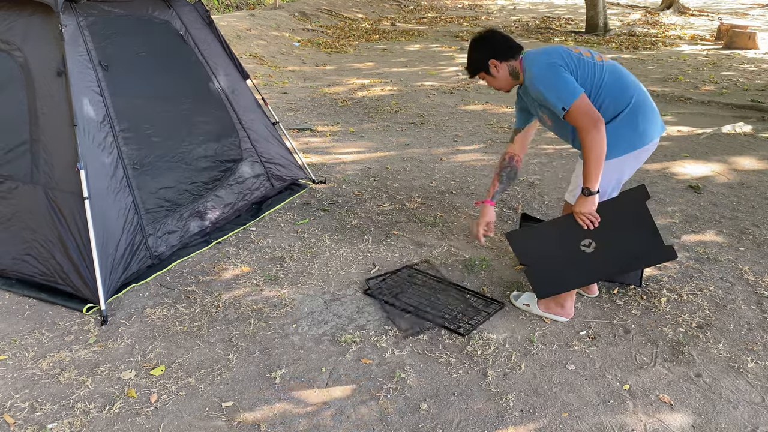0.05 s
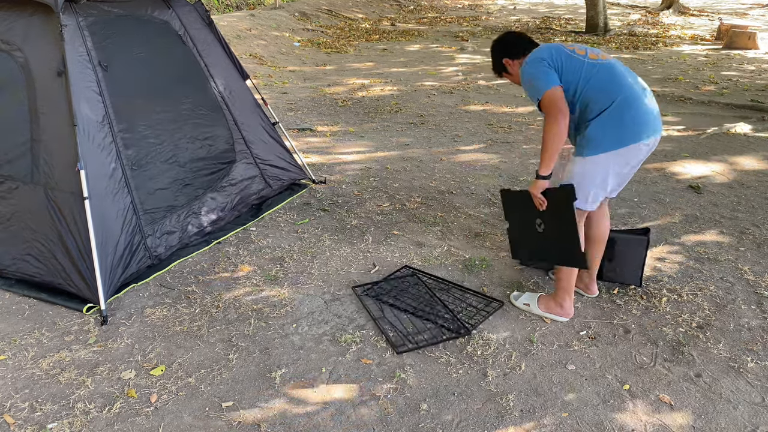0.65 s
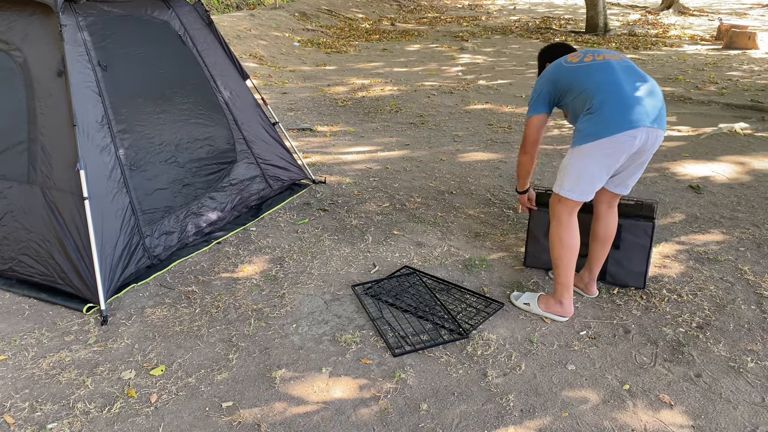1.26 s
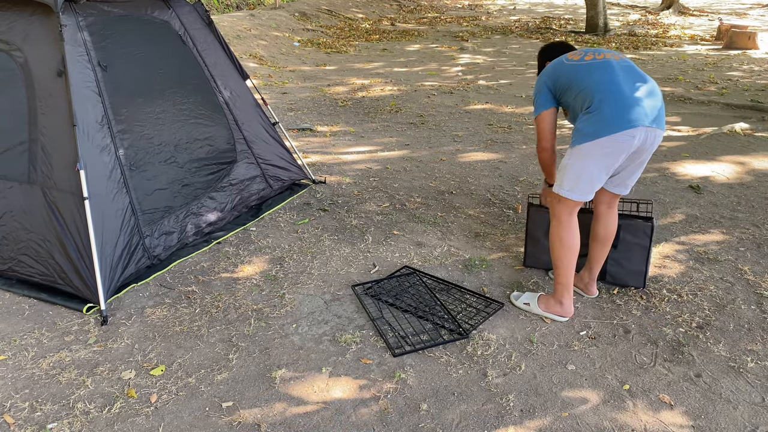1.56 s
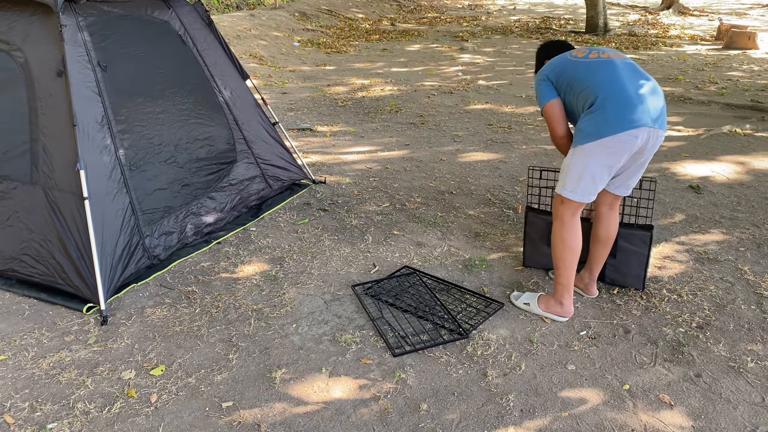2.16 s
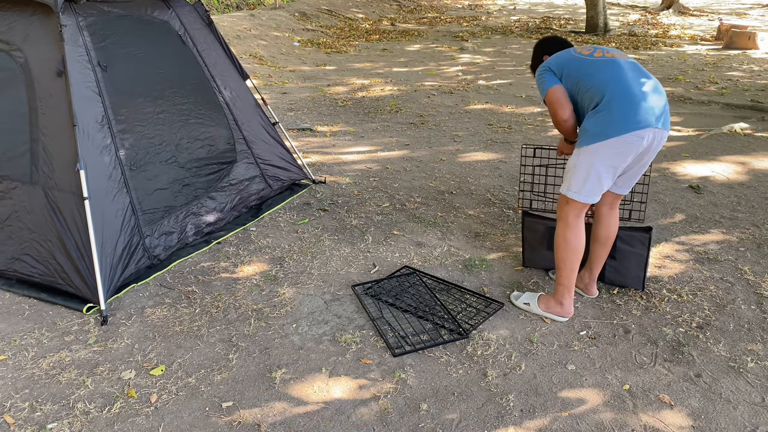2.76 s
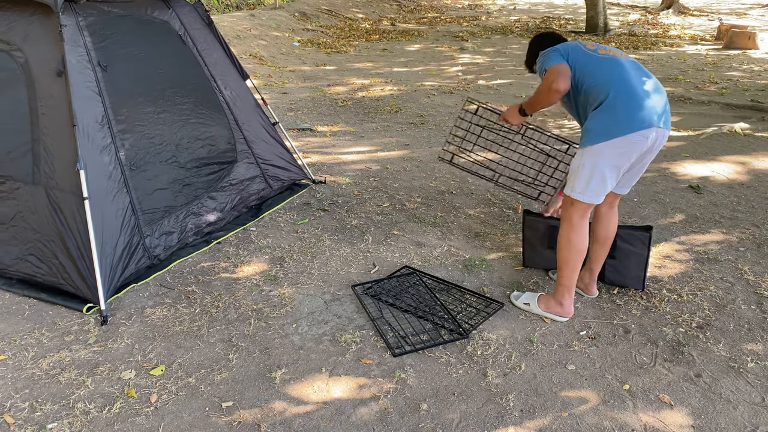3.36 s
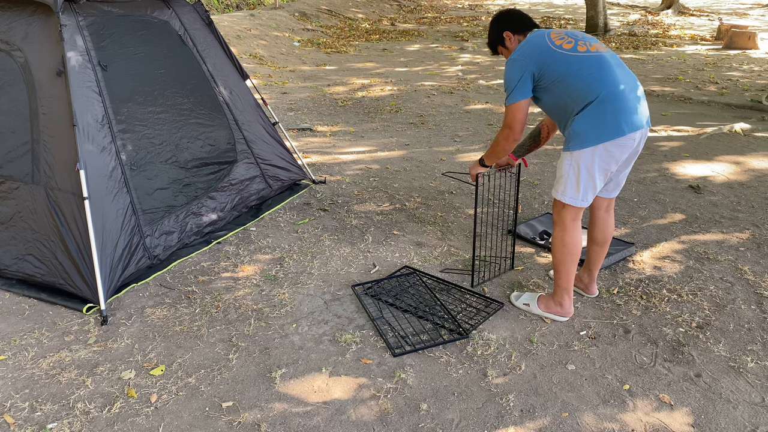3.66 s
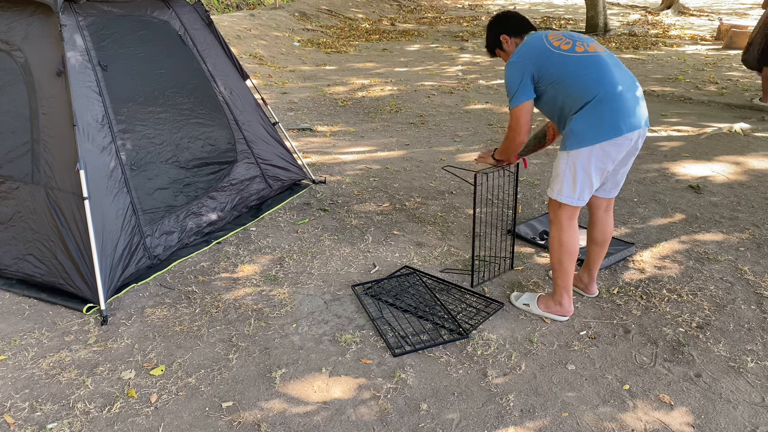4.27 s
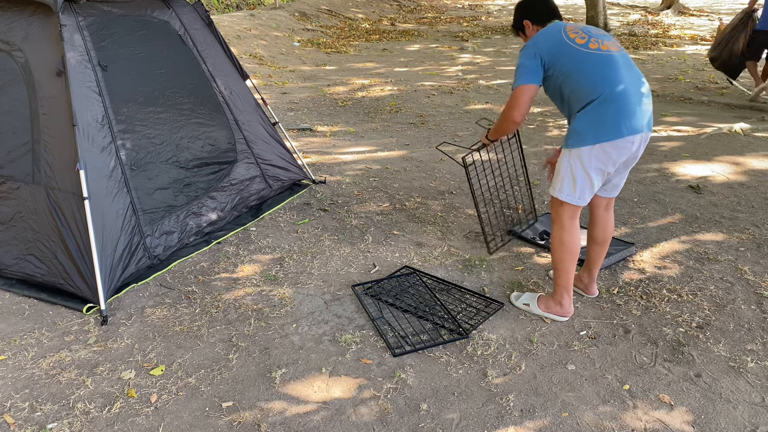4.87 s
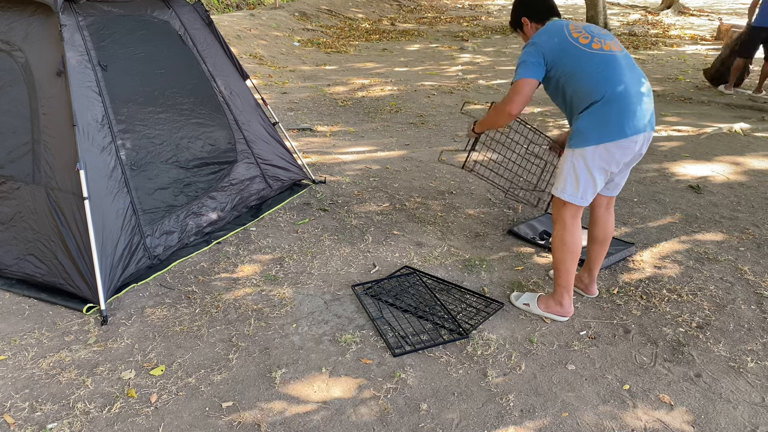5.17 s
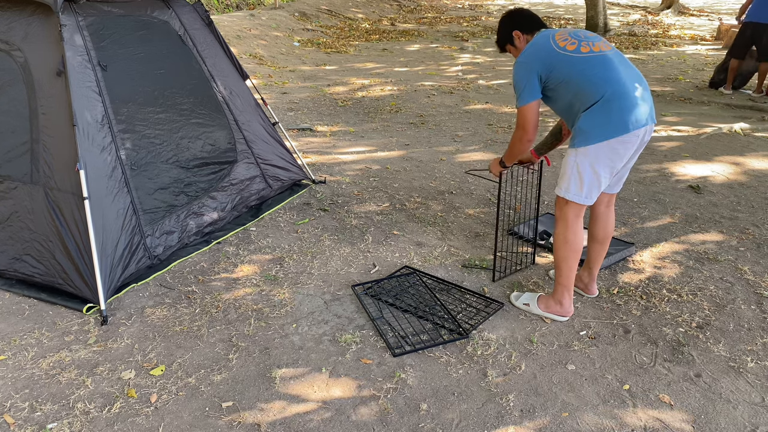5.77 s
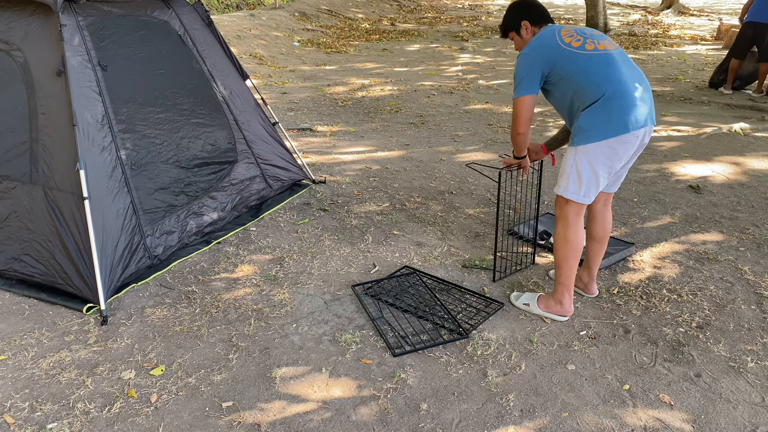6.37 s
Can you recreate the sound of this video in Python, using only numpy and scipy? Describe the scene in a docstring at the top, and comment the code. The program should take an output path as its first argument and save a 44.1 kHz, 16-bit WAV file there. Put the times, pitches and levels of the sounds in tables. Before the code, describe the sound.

Right at the start, metal wire-grid panels fall on each other on packed dirt. They bounce and chatter with a bright ring over damped thuds, strongest near 0.1 and 0.4 seconds, and lie still by 0.9 seconds. This is by far the loudest event. A padded fabric bag is set down slightly to the right, with dull bumps and two sharp wire clicks around 1.4 seconds. Until about 2.7 seconds a panel is drawn out in faint, catching rubs, with a small knock at 2.3. Soft cloth swishes come and go throughout. Wire legs click sharply around 4 seconds, then tick lightly near 4.4 and 4.8. A few dull handling bumps come around 5.3 to 5.4 seconds, and more clicks near 5.9. A faint, low, distant rumble lies under everything. The place is open air, heard by a phone a few metres away.

```python
"""Wire-grid table panels drop on each other on packed dirt and clatter to rest: each impact excites the
grids' bending modes, and the dirt answers with damped thuds. A padded fabric bag is set down, buckling
in dull bumps; another panel is drawn out with stick-slip friction, and its wire legs click as they
unfold. Cloth swishes over a low distant rumble in open air, heard from a few metres by a phone with
two microphones."""
import sys
import numpy as np
from scipy import signal
from scipy.fft import rfft, irfft, next_fast_len
from scipy.io import wavfile
from scipy.ndimage import map_coordinates

SR = 44100
rng = np.random.default_rng(int(sys.argv[2]) if len(sys.argv) > 2 else 0)


def generate_wav(sig):
    """Save sig (samples, or channels by samples) to the path in sys.argv[1] as 16-bit PCM at SR."""
    pcm = np.round(np.clip(np.atleast_2d(sig).T, -1, 1) * 32767).astype(np.int16)
    wavfile.write(sys.argv[1], SR, pcm)


N = 283342
T = np.arange(N) / SR
TOP_HZ = 15800  # upper limit of the phone's band
LEAD_S = 0.05  # bounces may begin this long before a hard contact
LANDED_S, SETTLED_S = 0.012, 0.935  # the falling panels first touch; they lie flat

# panel-on-panel impacts: (time [s], relative level [dB], build-up [s], rattle decay [s], wire pitch [Hz])
PANEL_IMPACTS = [(0.011, -7, 0.0025, 0.019, 7450), (0.043, -5.5, 0.0017, 0.01, 2750),
                 (0.068, -3.5, 0.00058, 0.01, 7000), (0.078, -3, 0.0017, 0.0046, 11000),
                 (0.0847, 2, 0.00039, 0.0021, 7300), (0.089, 0.5, 0.0008, 0.0035, 10900),
                 (0.116, -7.5, 0.0011, 0.015, 4800), (0.3247, -8, 0.0007, 0.0068, 1770),
                 (0.353, -10, 0.0097, 0.0075, 1100), (0.398, -5, 0.0012, 0.018, 6370),
                 (0.4211, -0.5, 0.008, 0.028, 2850), (0.434, 2.5, 0.0049, 0.028, 1260),
                 (0.630, -5, 0.00059, 0.0055, 7380), (0.7597, -21, 0.00072, 0.013, 6900),
                 (0.787, -6, 0.012, 0.016, 7100), (0.869, -16.5, 0.0028, 0.017, 5100)]
# strongest modes of the falling grids: (frequency [Hz], relative level [dB], t60 [s])
FALLING_MODES = [(462, -15.5, 0.31), (797, -14, 0.4), (1100, -8, 0.24), (1248, -9.5, 0.43),
                 (1364, -3.5, 0.16), (1800, -4, 0.32), (2100, -5.5, 0.23), (2330, -10.5, 0.24),
                 (2600, -2, 0.3), (2834, -5.5, 0.3), (3600, -4, 0.2), (4460, -5, 0.3), (4786, -0.5, 0.22),
                 (6355, -3, 0.18), (6860, -4, .2), (7300, 4, 0.1), (11000, 7, 0.14), (11500, 0, 0.1),
                 (15420, 5.5, 0.15)]
# spectral envelope of the falling grids: (frequency [Hz], relative level [dB])
FALLING_SPECTRUM = [(150, -9.5), (400, -14), (700, -16), (1300, -8.5), (1900, -2.5), (2300, -2), (2800, -2),
                    (3500, -5.5), (5500, -2.5), (7200, 0.5), (8500, 0.5), (11000, 1.5), (13200, 0),
                    (15200, -1)]
def falling_panels():
    """Impact excitation: panels strike, bounce and chatter on each other until the dirt damps them."""
    force = 0
    for s, db, build, decay, hz in PANEL_IMPACTS:
        impact = emphasise(blow(build, decay, rattle_db=5.5), hz, relative_width=0.084, lift_db=1.5)
        force = force + undb(db) * place(impact, s - LEAD_S)
    force = undb(11) * force
    panels = grid_responses(FALLING_SPECTRUM, FALLING_MODES, t60=0.15, modes_db=-25, cluster_db=3,
                            crack_db=-10, crack_s=0.0023, crack_tilt=0.29)
    ring = strike(force + chatter(force), panels, hop_rate=90)
    return ring * np.exp(-np.maximum(T - SETTLED_S, 0) / 0.0048)


def blow(build_s, decay_s, rattle_db):
    """Contact force: one hard impulse inside a burst of wire-on-wire rebounds; energy 1."""
    age = T[:SR // 4] - LEAD_S
    swell = np.exp(-np.maximum(age / decay_s, -age / build_s))
    bounces = swell * rng.standard_normal(len(age)) * (rng.random(len(age)) < 0.06)
    force = undb(rattle_db) * bounces / np.sqrt(np.sum(bounces ** 2) + 1e-12)
    force[np.searchsorted(age, 0)] += 1
    return force / np.linalg.norm(force)


def chatter(force, steady_db=-31.5, stir_db=-28, stir_s=0.063, settling_s=0.11, edge_hz=9900):
    """Contact rattle: loose wires tick on each other, harder after every blow, until they lie flat."""
    retention = np.exp(-1 / (stir_s * SR))
    stirred_power = signal.lfilter([1 - retention], [1, -retention], force ** 2)
    strength = np.sqrt(undb(steady_db) ** 2 + undb(stir_db) ** 2 * stirred_power)
    loose = (T > LANDED_S) * (T < SETTLED_S) * np.clip((SETTLED_S - T) / settling_s, undb(-11), 1)
    ticks = contacts(rate=700, scatter_db=2.5) * loose * strength
    return shape(ticks, lambda hz: 1 / np.sqrt(1 + (hz / edge_hz) ** 4))  # duller than a blow


def grid_responses(spectrum, modes, t60, modes_db, cluster_db, crack_db, crack_s, crack_tilt,
                   count=1100, points=8):
    """Modal superposition: each point of a welded grid gives its own mix of damped modes and a crack."""
    t = T[:SR // 3]
    hz = 200 + (TOP_HZ - 200) * (np.arange(count) + rng.random(count)) / count
    clusters = np.repeat(rng.standard_normal(count), 5)[:count]  # like wires ring at nearly one pitch
    gain = undb(at(spectrum, hz) + cluster_db * np.minimum(clusters, 1))
    life = t60 * np.exp(0.2 * rng.standard_normal(count))
    # no two wires are quite alike, so the strong modes come as beating pairs
    strong_hz, strong_db, strong_life = np.repeat(modes, 2, axis=0).T
    strong_hz = strong_hz * (1 + 0.003 * np.tile([-1, 1], len(modes)))
    hz, life = np.r_[hz, strong_hz], np.r_[life, strong_life]
    gain = np.r_[gain / np.linalg.norm(gain), undb(strong_db + modes_db) / np.sqrt(2)]
    times_t = lambda rates: np.outer(np.float32(rates), np.float32(t))
    damped_sines = np.sin(times_t(2 * np.pi * hz)) * np.exp(times_t(-np.log(1000) / life))
    responses = []
    for _ in range(points):
        weights = gain * rng.choice([-1, 1], (2, len(hz))) * rng.uniform(0.1, 1.9, (2, len(hz)))
        ring = unit(np.float32(weights) @ damped_sines)
        bright = shape(rng.standard_normal((2, len(t))), lambda f: (f + 1) ** crack_tilt)
        crack = unit(colour(bright, spectrum) * np.exp(-t / crack_s))
        responses.append(unit(ring + undb(crack_db) * crack) / np.sqrt(len(t)))
    return responses


def strike(force, responses, hop_rate):
    """Convolution of force and impulse response; the contact hops between wires, changing the timbre."""
    hop = (T[:len(force)] * hop_rate).astype(int)
    point = rng.integers(0, len(responses), len(force))[hop]
    return sum(signal.oaconvolve((force * (point == k))[None], response, axes=1)
               for k, response in enumerate(responses))[:, :N]


# knocks of legs and edges: (time [s], relative level [dB], rattle decay [s], wire pitch [Hz], lift [dB])
LEG_CLICKS = [(1.144, -36.5, 0.012, 1300, 23), (1.382, -20.5, 0.0017, 6570, 14),
              (1.4318, -26, 0.0003, 6760, 17), (2.309, -35, 0.00058, 6840, 13),
              (3.804, -36, 0.005, 3100, 15), (3.9774, -24, 0.00042, 2040, 3),
              (4.055, -21.5, 0.0034, 7900, 3), (4.438, -38.5, 0.024, 6400, 13),
              (4.803, -44, 0.00061, 6900, -2), (4.859, -36.5, 0.0084, 6540, 0),
              (5.853, -35, 0.0065, 2330, 15), (5.878, -23, 0.0012, 1880, 4),
              (5.944, -33.5, 0.0024, 2950, -2)]
# strongest modes of the held panel: (frequency [Hz], relative level [dB], t60 [s])
HELD_PANEL_MODES = [(1863, 5, 0.063), (2040, 6.5, 0.052), (2690, 4, 0.07), (4420, 7, 0.14), (5470, 2, 0.09),
                    (10750, 10, 0.06)]
# spectral envelope of the held panel: (frequency [Hz], relative level [dB])
HELD_SPECTRUM = [(200, 4), (900, -3), (1300, -1), (1900, 4), (2650, 4), (3250, -1.5), (4450, 6), (5200, 4),
                 (6700, 2), (9000, 0), (10300, 5), (12000, -0.5), (13300, -9), (15200, -4)]
def held_panel():
    """Damped free vibration: legs snap against a hand-held frame, the bounces scattered over its wires."""
    panel = grid_responses(HELD_SPECTRUM, HELD_PANEL_MODES, t60=0.24, modes_db=-16, cluster_db=4,
                           crack_db=-3, crack_s=0.006, crack_tilt=0.45)
    out = 0
    for s, db, decay, hz, lift_db in LEG_CLICKS:
        snap = strike(blow(0.0001, decay, rattle_db=4), panel, hop_rate=SR)
        snap = emphasise(snap, hz, relative_width=0.069, lift_db=lift_db)
        out = out + undb(db) * place(snap, s - LEAD_S)
    return undb(11) * out


# soft landings on the ground: (time [s], level [dB], pitch [Hz], decay [s])
GROUND_THUDS = [(0.081, -37, 410, 0.025), (0.318, -42, 111.2, 0.065), (0.326, -45, 329, 0.02),
                (0.351, -38.5, 166, 0.016), (0.433, -41, 336, 0.014), (0.513, -35.5, 181, 0.02),
                (0.625, -46, 89.8, 0.13), (0.78, -40, 216.5, 0.018), (0.801, -29, 97.6, 0.026),
                (0.803, -43, 55.4, 0.054), (0.869, -41, 224, 0.014), (1.148, -43, 373, 0.03)]
def ground_thuds():
    """Heavily damped oscillation: the dirt takes the weight in a few low, gritty cycles."""
    out, t = 0, T[:SR // 2]
    for s, db, hz, decay in GROUND_THUDS:
        noise = rng.standard_normal((2, len(t)))
        grit = unit(shape(noise, lambda f: 1 / (1 + (f / hz - hz / (f + 1)) ** 2)))
        phase = 2 * np.pi * hz * t
        body = np.array([np.sin(phase), np.cos(phase)]) + undb(-1) * grit
        envelope = np.exp(-t / decay) * (1 - np.exp(-t / 0.0012))
        out = out + place(body * undb(db) * envelope, s)
    return out


# bumps of bag and hands: (time [s], level [dB], decay [s], upper edge [Hz], pitch [Hz])
BAG_BUMPS = [(0.937, -42.5, 0.052, 1310, 770), (1.387, -36, 0.035, 2330, 228),
             (1.422, -34.5, 0.046, 2450, 202), (1.44, -32, 0.011, 2400, 480),
             (2.311, -42.5, 0.04, 1430, 403), (4.057, -49, 0.013, 1500, 400),
             (5.295, -39.5, 0.02, 905, 530), (5.298, -39, 0.025, 970, 920),
             (5.353, -41.5, 0.0065, 1540, 940), (5.38, -40, 0.0097, 1560, 510),
             (5.399, -28.5, 0.0018, 1800, 930)]
# spectral envelope of a crumple: (frequency [Hz], relative level [dB])
CRUMPLE_SPECTRUM = [(60, -13), (180, -1), (380, 1), (650, -5.5), (950, -2), (1500, -2.5), (2300, 4.5),
                    (5000, 9)]
def bag_bumps():
    """Buckling: stiff padded fabric gives way in short dull crumples, each with its own hollow pitch."""
    out, t = 0, T[:SR // 2]
    for s, db, decay, edge_hz, pitch_hz in BAG_BUMPS:
        noise = rng.standard_normal((2, len(t))) * undb(2 * rng.standard_normal(len(t)))
        dull = shape(noise, lambda hz: undb(at(CRUMPLE_SPECTRUM, hz)) / np.sqrt(1 + (hz / edge_hz) ** 6))
        crumple = emphasise(hollow(dull), pitch_hz, relative_width=0.12, lift_db=5.5)
        envelope = np.exp(-t / decay) * (1 - np.exp(-t / 0.0019))
        out = out + place(crumple * undb(db) * envelope, s)
    return out


# hollow resonances of bumps and rubbing: (frequency [Hz], bandwidth [Hz], gain [dB])
HOLLOW_RESONANCES = [(332, 21, 7.5), (487, 39, 7), (825, 490, 0), (1250, 220, -11), (1730, 390, -8.5)]
def hollow(x):
    """Parallel resonators add a hollow colour to a dull sound; rms 1."""
    peaks = lambda f: sum(undb(db) / (1 + 2j * (f - hz) / width) for hz, width, db in HOLLOW_RESONANCES)
    return unit(shape(x, lambda f: 1 + peaks(f)))


# pulls of wire over fabric: (time [s], duration [s], level [dB], wire pitch [Hz], lift [dB])
WIRE_PULLS = [(0.924, 0.26, -59, 1710, -3), (1.234, 0.027, -53, 1930, 7), (1.3, 0.023, -52.5, 1810, 8),
              (1.493, 0.051, -56, 510, 1), (1.923, 0.028, -57, 200, 17), (2.003, 0.04, -51, 446, -2),
              (2.065, 0.026, -54.5, 1200, 17), (2.129, 0.034, -50, 1830, 14.5),
              (2.178, 0.022, -54, 1730, 14.5), (2.238, 0.036, -49.5, 1270, 9), (2.302, 0.092, -56, 880, 7),
              (2.491, 0.17, -54.5, 840, 4), (3.575, 0.033, -55.5, 600, 10), (3.68, 0.13, -62, 750, 0),
              (5.106, 0.061, -55, 605, 16)]
# notes of the dragged wires: (frequency [Hz], width [Hz], relative level [dB])
WIRE_NOTES = [(921, 55, 2.5), (1310, 110, -1), (1765, 34, 3)]
# spectral envelope of rubbed fabric: (frequency [Hz], relative level [dB])
RUB_SPECTRUM = [(80, -7.5), (200, 0.5), (420, 0), (700, -4.5), (1250, -4), (2000, -8), (3200, -4.5),
                (6000, -23)]
def wire_rubbing():
    """Stick-slip friction: wire drags over woven fabric; in each pull another wire sings through."""
    slip = slips(rate=2500, scatter_db=2)
    notes = lambda f: sum(undb(db) / (1 + 2j * (f - hz) / width) ** 2 for hz, width, db in WIRE_NOTES)
    singing = unit(shape(slip, notes))
    rub = hollow(colour(slip, RUB_SPECTRUM)) + undb(-10.5) * singing
    out = 0
    for s, length, db, hz, lift_db in WIRE_PULLS:
        effort = strokes([(s, length, db)], attack_s=0.01, release_s=0.046)
        out = out + emphasise(rub * effort, hz, relative_width=0.05, lift_db=lift_db)
    return waver(out, depth_s=0.00028, rate=45) * undb(1.6 * walk(rate=60))


def waver(pair, depth_s, rate):
    """Frequency modulation: a wandering delay bends the pitch, as changing sliding speed does."""
    moment = T + depth_s * walk(rate)
    return np.array([map_coordinates(x, [moment * SR]) for x in pair])


# slides of cloth: (time [s], duration [s], level [dB])
CLOTH_SLIDES = [(1.6, 0.14, -61.5), (1.76, 0.054, -58), (1.86, 0.11, -51.5), (2.06, 0.39, -63),
                (2.56, 0.25, -54.5), (3.08, 0.04, -53.5), (3.26, 0.19, -59.5), (3.5, 0.42, -61.5),
                (4.805, 0.32, -60), (5.12, 0.071, -57.5), (5.29, 0.44, -61), (6.3, 0.14, -62.5)]
# spectral envelope of the cloth's hiss: (frequency [Hz], relative level [dB])
HISS_SPECTRUM = [(600, -3.5), (2000, 3), (3500, -3), (5000, -0.5), (7000, 1.5), (9000, -8), (11000, -1.5),
                 (13000, -7.5), (14500, -7.5)]
def cloth_swishes():
    """Friction noise: dense tiny slips of cloth merge into a fine hiss over a soft, dull rustle."""
    hiss = colour(slips(rate=12000, scatter_db=2.5), HISS_SPECTRUM)
    rustle = undb(-6.5) * colour(slips(rate=1200, scatter_db=1), RUB_SPECTRUM)
    slides = strokes(CLOTH_SLIDES, attack_s=0.049, release_s=0.18)
    motion = np.hypot(slides, undb(-64))  # clothes never lie quite still
    return (hiss + rustle) * motion * undb(0.8 * walk(rate=39))


# spectral envelope of the distant rumble: (frequency [Hz], relative level [dB])
RUMBLE_SPECTRUM = [(12, -68), (22, -33), (40, -9), (70, 4), (120, -2), (172, -9), (260, -14.5),
                   (447, -16.5), (555, -18), (1050, -17.5), (1500, -28.5), (1950, -23.5), (3300, -120)]
def distant_rumble():
    """Ambient noise: a far, low rumble under slight random amplitude modulation."""
    return colour(rng.standard_normal((2, N)), RUMBLE_SPECTRUM) * undb(-53.5 + 0.64 * walk(rate=8))


# right microphone against the left: (frequency [Hz], phase lag [rad])
PORT_PHASE = [(7300, 0), (7900, -2.3), (9300, -3.2), (10400, -6.2), (11700, -6.3), (13300, -9.4),
              (14700, -12.5)]
# scattered share of the sound: (frequency [Hz], relative level [dB])
SCATTERED_SHARE = [(100, 0), (300, -4), (700, -10), (1400, -18), (3000, -12), (6000, -5), (9000, -7),
                   (11000, -13), (15000, -14)]
def microphones(pair, lag_s, pan_db, spread_db):
    """Partial coherence: two ports share the direct sound but differ in scattered sound and in phase."""
    direct = pair[0]
    scattered = shape(pair[1], lambda hz: undb(np.minimum(at(SCATTERED_SHARE, hz) + spread_db, 0)))
    # sound from the right reaches that port first, by one cycle at most
    lead = lambda hz: 2 * np.pi * np.minimum(hz * lag_s, 1) - at(PORT_PHASE, hz)
    right = shape(direct - scattered, lambda hz: np.exp(1j * lead(hz)))
    return np.array([(direct + scattered) * undb(pan_db / 2), right * undb(-pan_db / 2)])


def strokes(table, attack_s, release_s):
    """Power summation of hand movements: each gain swells, holds for its length and dies away."""
    fade = lambda s, length: np.maximum(s - T, 0) / attack_s + np.maximum(T - s - length, 0) / release_s
    return np.sqrt(sum((undb(db) * np.exp(-fade(s, length))) ** 2 for s, length, db in table))


def contacts(rate, scatter_db):
    """Shot noise: randomly timed tiny impacts of uneven size; rms 1."""
    impulses = (rng.random(N) < rate / SR) * rng.choice([-1, 1], N)
    return unit(impulses * undb(scatter_db * rng.standard_normal(N)))


def slips(rate, scatter_db):
    """Two uncorrelated streams of tiny slips."""
    return np.array([contacts(rate, scatter_db) for _ in range(2)])


def emphasise(x, hz, relative_width, lift_db):
    """Resonance: lift one band of a sound, conserving its total energy."""
    y = shape(x, lambda f: 1 + undb(lift_db) / (1 + 2j * (f - hz) / (relative_width * hz)))
    return y * np.linalg.norm(x) / np.linalg.norm(y)


def colour(x, table):
    """Filter by a tabulated spectral envelope; rms 1."""
    return unit(shape(x, lambda hz: undb(at(table, hz))))


def shape(x, response):
    """Linear filtering: multiply the spectrum by a frequency response."""
    size = next_fast_len(x.shape[-1] + 4096)
    hz = np.arange(size // 2 + 1) * SR / size
    return irfft(rfft(x, size) * response(hz), size)[..., :x.shape[-1]]


def at(table, hz):
    """Interpolate a (frequency [Hz], value) table on a log-frequency axis."""
    f, value = np.transpose(table)
    return np.interp(np.log(hz + 1), np.log(f), value)


def walk(rate):
    """Smooth random wandering with a spread near 1."""
    knots = rng.standard_normal(int(N / SR * rate) + 2)
    return np.interp(T * rate, np.arange(len(knots)), knots)


def place(x, s):
    """Put a short sound on the timeline at time s."""
    return np.pad(x, [(0, 0)] * (x.ndim - 1) + [(SR + int(s * SR), N)])[..., SR:SR + N]


def undb(db):
    """Decibels to amplitude ratio."""
    return 10 ** (np.asarray(db) / 20)


def unit(x):
    """Scale to rms 1."""
    return x / np.sqrt(np.mean(x ** 2))


def scene():
    """Superposition: the panels sound from straight ahead; bag and cloth are to the right."""
    return (microphones(falling_panels() + ground_thuds(), lag_s=0, pan_db=0, spread_db=0.5)
            + microphones(held_panel(), lag_s=0, pan_db=-0.5, spread_db=5)
            + microphones(bag_bumps() + wire_rubbing(), lag_s=0.00011, pan_db=-2.5, spread_db=3.5)
            + microphones(cloth_swishes(), lag_s=0.00018, pan_db=-1, spread_db=9)
            + microphones(distant_rumble(), lag_s=0.00036, pan_db=-0.6, spread_db=-13))


def record(dry):
    """Band limiting: the phone's steep low-pass filter cuts the top."""
    return signal.sosfilt(signal.ellip(10, 0.2, 70, TOP_HZ, fs=SR, output="sos"), dry)


dry = scene()
out = record(dry)
generate_wav(out)
```